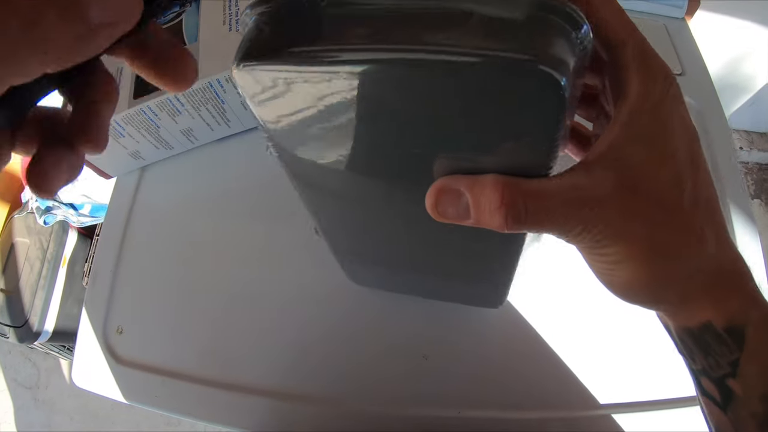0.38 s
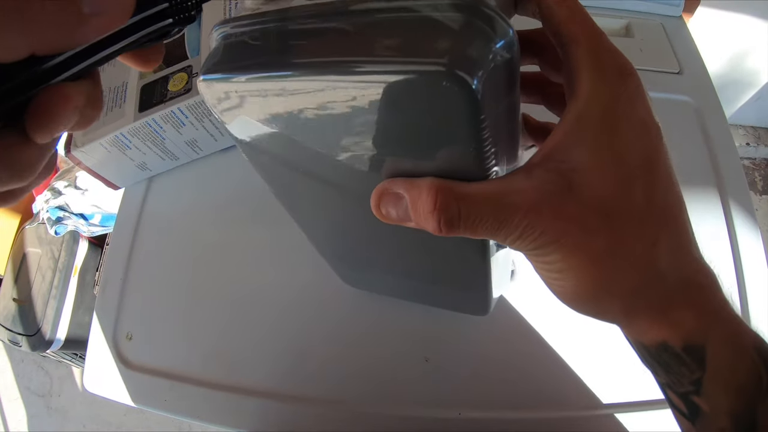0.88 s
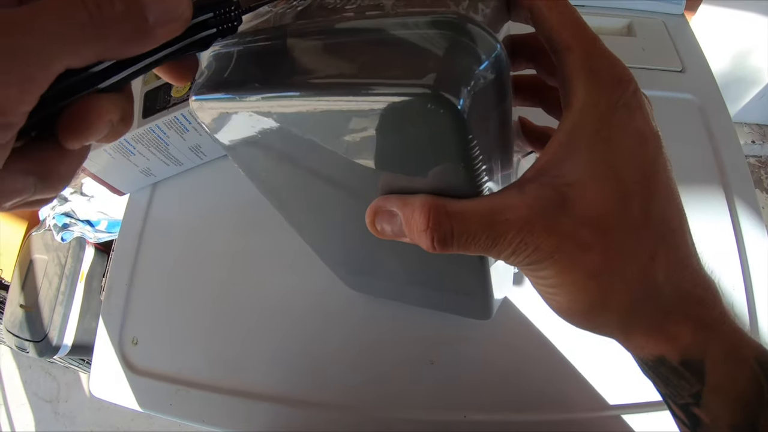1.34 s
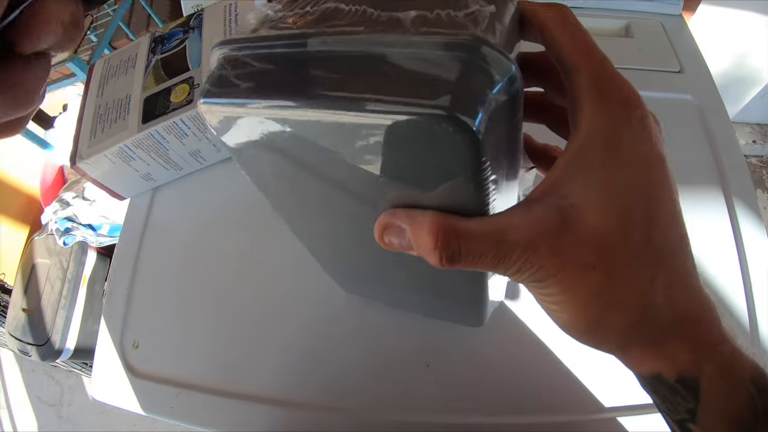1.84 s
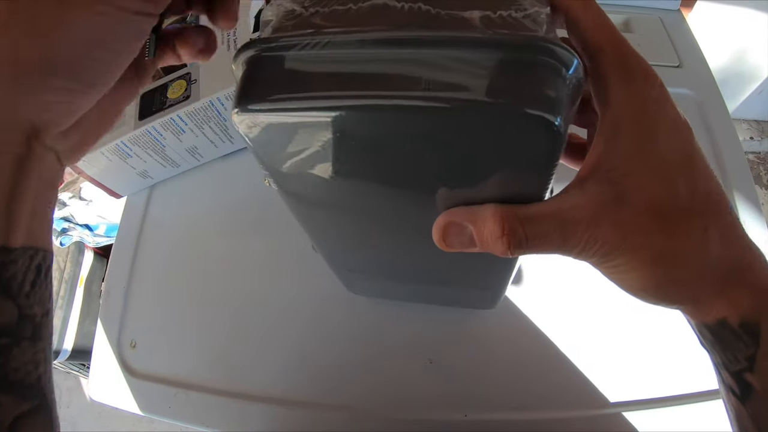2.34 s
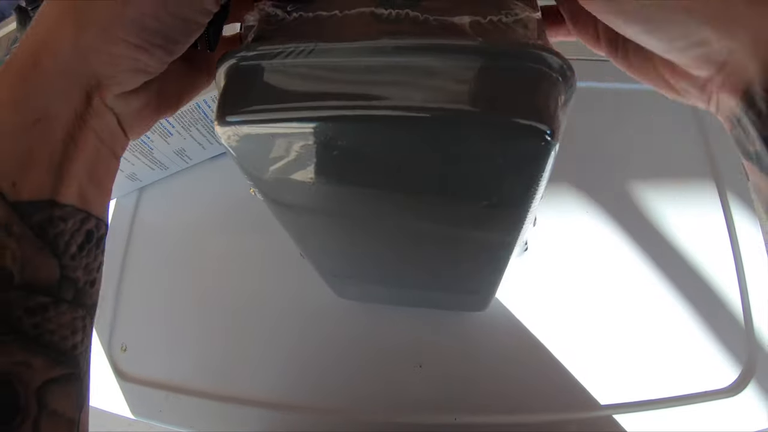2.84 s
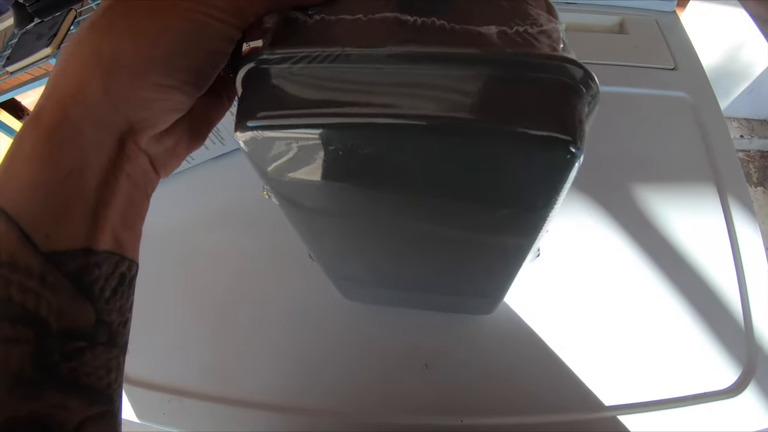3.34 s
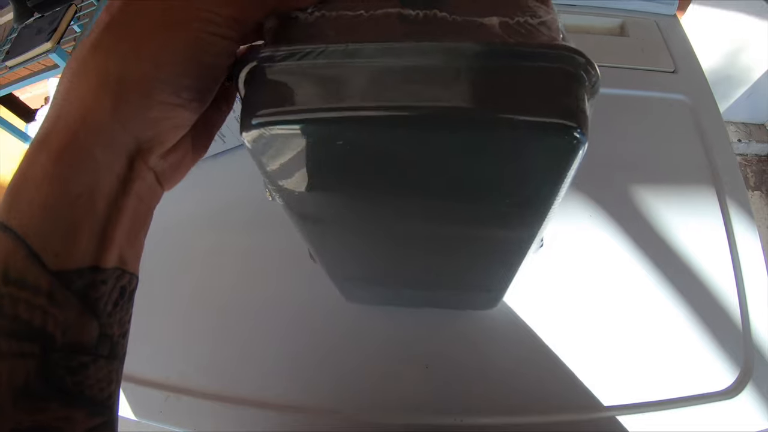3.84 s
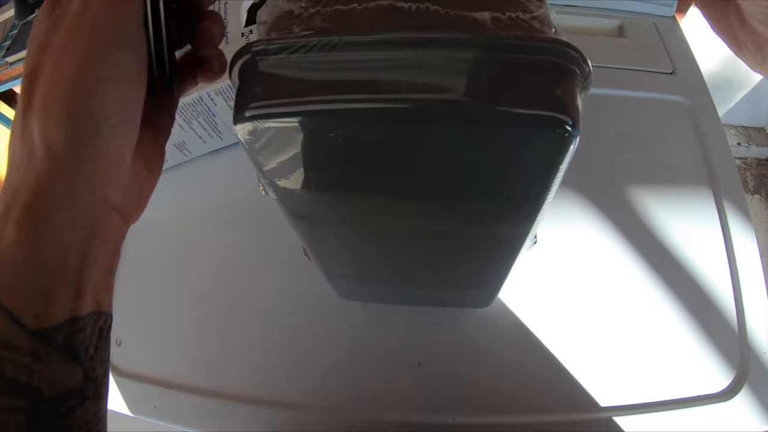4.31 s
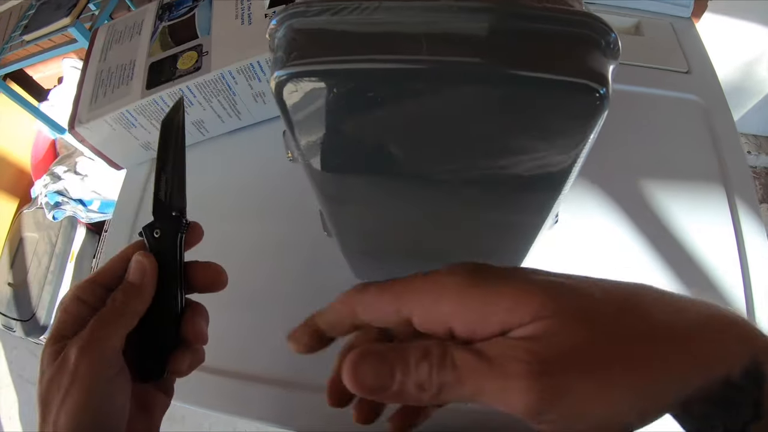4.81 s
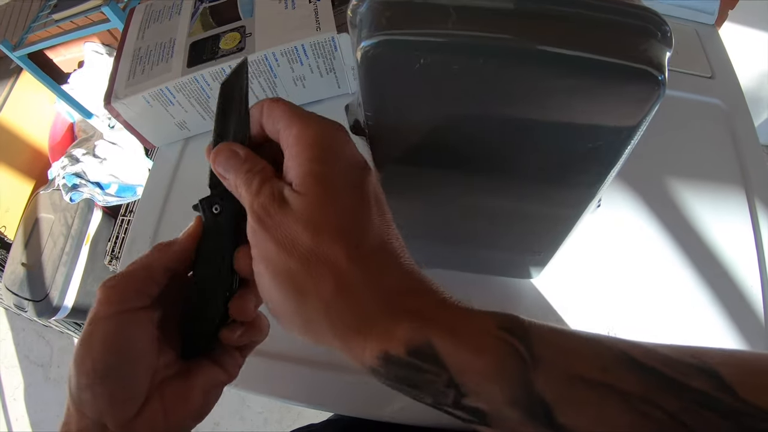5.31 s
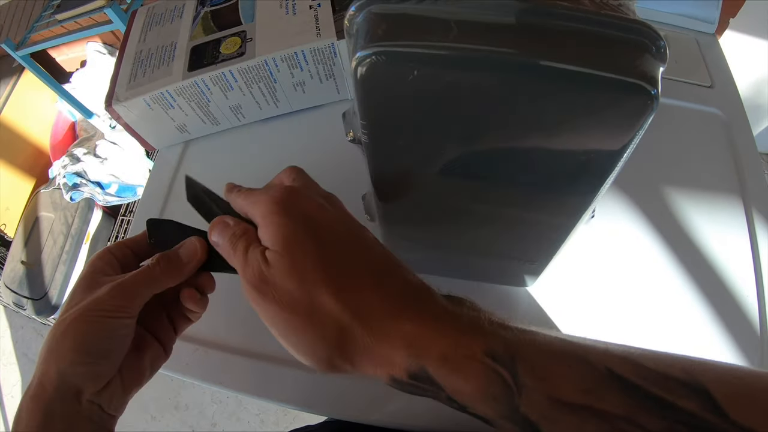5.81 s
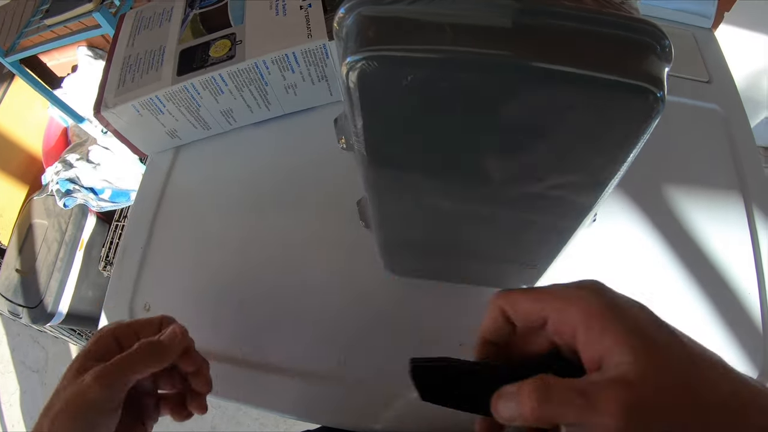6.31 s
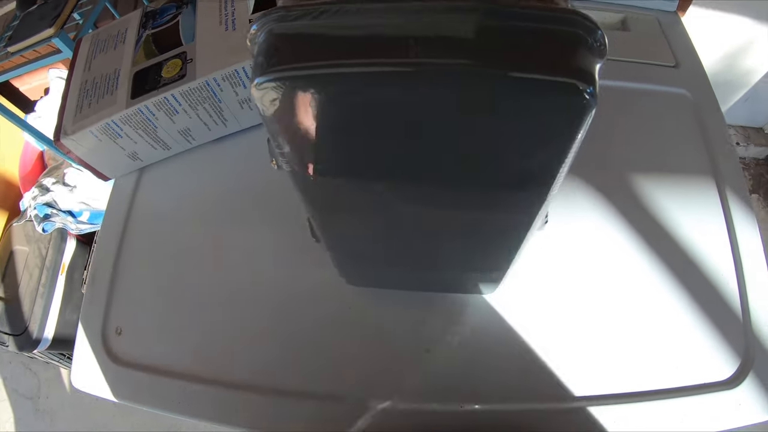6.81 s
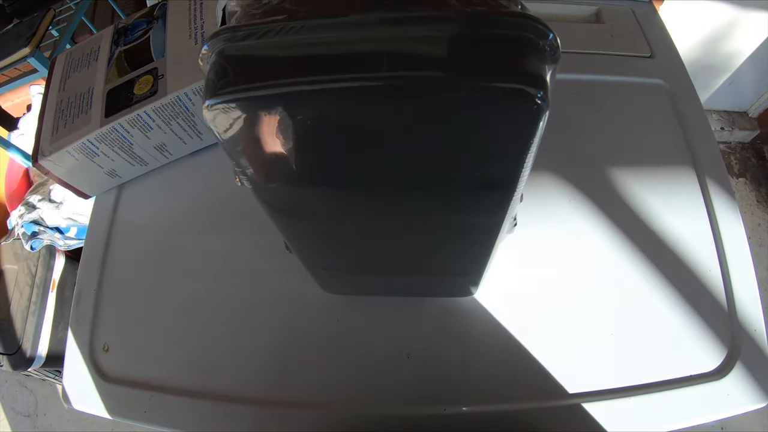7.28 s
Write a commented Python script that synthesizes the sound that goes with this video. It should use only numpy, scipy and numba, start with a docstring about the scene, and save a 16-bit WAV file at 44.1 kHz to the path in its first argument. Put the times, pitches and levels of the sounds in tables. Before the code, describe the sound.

Steady low traffic rumble and soft tyre roar lie behind everything, slightly to the right, swelling gently. At 0 s a box bumps lightly on a hollow table, with a faint shudder and film rubbing. From 1.1 to 1.4 s film crackles brightly; around 1.65 s comes the sharpest snap, with knocks, then the heaviest dull, boomy thumps near 1.9 s. Smaller bumps and rustles follow, with a wavering far engine hum at 2.4-3.1 s. At 2.9 s a finger drags briefly on taut film. Crinkling resumes at 3.2 s and thickens into a dense tearing crackle from 3.6 to 4.2 s, with light table bumps. Another engine hums low from 4.2 to 5.1 s amid faint rubbing. Small knife clicks sound at 5.4-5.55 s, a tight, crisp cluster at 5.9 s, and one at 6.54 s. A car passes softly around 5.7 s; faint rustle and traffic remain until about 7.7 s.

```python
"""First a box bumps a hollow table outdoors, over the hum of far traffic, as film and sleeves begin to rub.
Then hands tear plastic film off the box: creases snap and rustle, and a finger drags on the taut film.
Engines hum far off, a car passes nearer, and the lock, blade and clip of a knife click near the end.
Noise is shaped into traffic, rubbing, scraping and dragging; resonances carry the table's shudder.
Short dying sines make the bumps, snaps and clicks, and a noise tail from nearby walls follows near sounds."""
import sys
import numpy as np
from scipy import signal
from scipy.fft import rfft, irfft
from scipy.io import wavfile
from scipy.ndimage import uniform_filter1d
from numba import njit

SR = 44100
rng = np.random.default_rng(int(sys.argv[2]) if len(sys.argv) > 2 else 0)


def gain_from_decibels(decibels):
    """Convert decibel values to linear amplitude factors."""
    exponent = np.asarray(decibels, float) / 20
    return 10 ** exponent


def generate_wav(signal):
    """Clip the signal to [-1, 1] and save it as 16-bit WAV at the path in sys.argv[1]."""
    frames = np.transpose(np.atleast_2d(signal))
    scaled = np.clip(frames, -1, 1) * 32767
    pcm = np.round(scaled).astype(np.int16)
    wavfile.write(sys.argv[1], SR, pcm)


N = 337806  # length in samples
T = np.arange(N) / SR  # time of every sample, in seconds
LEFT_RIGHT = np.array([[1], [-1]])


def along(table):
    """Read each column of a table that starts with time, at every sample."""
    s, *columns = np.transpose(table)
    return [np.interp(T, s, column) for column in columns]


def on_log(hz, table):
    """Read a (frequency, value) table, with frequency on a log scale as in hearing."""
    table_hz, value = np.transpose(table)
    return np.interp(np.log(np.maximum(hz, 1)), np.log(table_hz), value)


def colour(x, table):
    """Filter a sound to the given spectrum, with no sound ahead of its cause (minimum phase)."""
    cepstrum = irfft(np.log(gain_from_decibels(on_log(np.fft.rfftfreq(1024, 1 / SR), table))))
    # folding the second half onto the first makes the filter causal
    cepstrum[1:512] *= 2
    cepstrum[513:] = 0
    impulse = irfft(np.exp(rfft(cepstrum)))
    return signal.fftconvolve(x, impulse[None], axes=1)[:, :N]


# how much sound from all around differs between the two microphones:
# (frequency [Hz], side minus mid [dB])
STEREO_WIDTH = [(60, -23.5), (110, -23.5), (200, -17), (380, -16.5), (700, -2), (1290, 1.5), (2380, -4.5),
                (4400, -6.5), (8120, 3.5), (15000, -5)]


def diffuse(spectrum, size=N):
    """Stereo noise of rms 1 from all around: nearly alike in the bass, wider higher up."""
    hz = np.fft.rfftfreq(size, 1 / SR)
    mid, side = rfft(rng.standard_normal((2, size))) * gain_from_decibels(on_log(hz, spectrum))
    x = irfft(mid + LEFT_RIGHT * side * gain_from_decibels(on_log(hz, STEREO_WIDTH)), size)
    return x / np.sqrt(np.mean(x ** 2))


def walk(rate_hz):
    """A random wandering curve: values held for 1 / rate_hz seconds, then smoothed twice."""
    k = int(SR / rate_hz)
    held = np.repeat(rng.standard_normal(N // k + 1), k)
    return 1.05 * uniform_filter1d(uniform_filter1d(held, k), k)[:N]


@njit
def grains(start, hz, cycles, size, rise):
    """Each grain is a sine that swells over about `rise` cycles and dies by 1 / e in `cycles` cycles."""
    out = np.zeros(N)
    for k in range(len(start)):
        turn = np.exp((2j * np.pi - 1 / cycles[k]) * hz[k] / SR)
        swell = np.exp(-hz[k] / SR / rise)
        i = int(start[k])
        # the start may fall between two samples
        z, unborn = size[k] * turn ** (i + 1 - start[k]), swell ** (i + 1 - start[k])
        while abs(z) > abs(size[k]) * 1e-3 and i + 1 < N:
            i += 1
            out[i] += z.imag * (1 - unborn) ** 2
            z, unborn = z * turn, unborn * swell
    return out


def panned_grains(s, hz, cycles, size, pan_db, lag):
    """The same grains at both microphones, with a level step [dB] and a lag [samples] between them."""
    hz = np.clip(hz, 200, .4 * SR)
    sides = []
    for side in (1, -1):
        start = np.maximum(s * SR + side * lag / 2, 0)
        sides.append(grains(start, hz, cycles, size * gain_from_decibels(side * pan_db / 2), 0.21))
    return np.array(sides)


# swelling of the traffic, before a small fixed lift of each part:
# (time [s], tyre roar level [dB], rumble level [dB])
TRAFFIC_SWELLS = [(0, -50, -37), (.4, -52.5, -40), (1.0, -51.5, -37.5), (2.2, -51, -39.5),
                  (3.0, -52.5, -42), (3.5, -50.5, -35.5), (4.15, -51, -44), (4.6, -51, -38.5),
                  (5.1, -50.5, -34.5), (5.5, -49.5, -40.5), (5.9, -51, -34.5), (6.6, -51.5, -38.5),
                  (7.66, -50.5, -39.5)]
# spectrum shape of the far tyre roar: (frequency [Hz], relative level per Hz [dB])
ROAR_COLOUR = [(60, -32), (100, -5.5), (250, -8.5), (340, -13), (390, -10.5), (450, -16), (760, -18.5),
               (1000, -22.5), (1420, -24.5), (2070, -29), (3000, -39), (4800, -50.5), (10000, -59.5),
               (11000, -67), (14300, -99)]
# spectrum shape of the low rumble: (frequency [Hz], relative level per Hz [dB])
RUMBLE_COLOUR = [(8.8, -49.5), (15, -0.5), (43, 6.5), (130, -14), (170, -44.5), (290, -120)]
# spectrum shape of the nearer car's tyres: (frequency [Hz], relative level per Hz [dB])
CAR_TYRE_COLOUR = [(450, -27), (750, 9), (1100, -9.5), (1450, 2.5), (1900, -2.5), (2500, -49.5)]


def traffic():
    """Tyre roar and low rumble swell on their own; one car gets louder as it nears, then fades."""
    roar_db, rumble_db = along(TRAFFIC_SWELLS)
    roar = gain_from_decibels(roar_db + 3.5 + walk(4.5)) * diffuse(ROAR_COLOUR)
    rumble = gain_from_decibels(rumble_db + 1.0 + 1.7 * walk(5)) * diffuse(RUMBLE_COLOUR)
    nearest_s, speed_m_s, nearest_m, nearest_db = 5.7, 15, 6.4, -55
    distance_m = np.hypot(nearest_m, speed_m_s * (T - nearest_s))
    car = gain_from_decibels(nearest_db) * nearest_m / distance_m * diffuse(CAR_TYRE_COLOUR)
    return roar + rumble + car


REST_DB = -88.5  # rubbing level between strokes, on the scale of the strokes below
# strokes of film and sleeves rubbing, levels before the hiss and crackle are scaled:
# (start [s], length [s], level at the start [dB], level at the end [dB])
RUB_STROKES = [(0, 0.076, -66, -75), (0.314, 0.06, -65, -69), (0.391, 0.17, -75, -63),
               (0.537, 0.12, -57.5, -69), (0.721, 0.02, -57.5, -53.5), (1.093, 0.043, -47.5, -71),
               (1.173, 0.08, -55, -49), (1.316, 0.23, -67, -56), (1.565, 0.081, -62.5, -49),
               (1.671, 0.14, -46, -57), (1.837, 0.078, -68, -71), (1.966, 0.14, -68.5, -58),
               (2.211, 0.22, -60, -79), (2.431, 0.036, -63.5, -74), (2.6, 0.069, -55, -71),
               (2.666, .065, -69, -66), (2.928, 0.41, -69.5, -65), (3.279, 0.2, -50, -65),
               (3.462, 0.2, -55.5, -60), (3.695, 0.05, -53.5, -51), (3.784, 0.22, -47, -47.5),
               (4.079, 0.017, -44, -65), (4.116, 0.094, -65, -51.5), (4.405, 0.2, -71, -66),
               (4.634, 0.072, -72, -62), (4.72, 0.087, -61, -72), (4.878, 0.077, -69, -70),
               (4.997, 0.45, -75, -77.5), (5.354, 0.018, -59, -65), (5.55, 0.39, -62.5, -71),
               (5.908, 0.025, -38.5, -52), (5.94, 0.084, -53.5, -68), (6.039, 0.057, -74, -67),
               (6.129, 0.096, -68.5, -69.5), (6.298, .4, -70, -72), (6.948, 0.14, -74, -79.5),
               (7.198, 0.18, -81.5, -78)]


def rubbing():
    """Level of the rubbing in dB: each stroke sets in fast, drifts from first to last level and dies fast."""
    rise_db_s, fall_db_s = 899.5, 748
    db = np.full(N, 1. * REST_DB)
    for s, length, first_db, last_db in RUB_STROKES:
        held = np.interp(T, [s, s + length], [first_db, last_db])
        before = rise_db_s * np.maximum(s - T, 0)
        after = fall_db_s * np.maximum(T - s - length, 0)
        db = np.maximum(db, held - before - after)
    return db


# spectrum shape of the rubbing hiss: (frequency [Hz], relative level [dB])
HISS_COLOUR = [(2000, -12), (3000, 3), (5000, -6.5), (7000, -9.5), (10300, -8), (11300, -23), (14000, -24),
               (16000, -41.5)]
# how the film colours its creases, both tiny ones here and the snaps: (frequency [Hz], gain [dB])
CREASE_COLOUR = [(300, -7), (900, -1), (1800, 2.5), (3000, 3), (4600, 2), (6000, 5.5), (8000, 5),
                 (10000, 9), (11500, -1), (14000, 4.5), (16400, -16)]


def rustle(count=18000):
    """Rubbing hiss in patchy bands around a moving centre; firm rubbing brings out thousands of tiny creases."""
    db = rubbing()
    centre_hz = 4100 + 42.5 * (db - REST_DB)  # firmer rubbing is brighter
    chance = rng.random((count, 5)).T
    pitch = 1600 * 2 ** (2.49 * chance[3])
    # most are faint, none far above the rest; low ones last longer, so they start weaker
    size = gain_from_decibels(-3.0 * np.log(chance[1] + .02)) * np.sign(chance[2] - .5) * np.sqrt(pitch)
    pan_db, lag = 6 * (chance[4] - .4), 4 * (chance[4] - .5)
    tiny = panned_grains(chance[0] * N / SR, pitch, np.full(count, 1.2), size, pan_db, lag)
    tiny = colour(tiny, CREASE_COLOUR)
    grit = np.clip((db + 62.0) / 12, 0, 1)  # 0 = hiss only, 1 = full crackle
    hiss, source = 0, diffuse(HISS_COLOUR)
    for hz in 2200 * 2 ** np.arange(0, 2.8, .2):
        edges_hz = [hz / 2 ** .1, hz * 2 ** .1]
        band = signal.sosfilt(signal.butter(2, edges_hz, "band", fs=SR, output="sos"), source)
        octaves = np.log2(hz / centre_hz)
        hiss = hiss + band * gain_from_decibels(np.maximum(-12 * octaves ** 2, -8) + 2.0 * walk(33))
    crackle = gain_from_decibels(0.5) * grit * tiny / tiny.std()
    hiss = gain_from_decibels(10.0 + 2.3 * walk(40)) * (1 - 0.72 * grit) * hiss
    return gain_from_decibels(db) * (crackle + hiss)


# the box shuddering on the table, level of the push before filtering:
# (start [s], length [s], level [dB])
BOX_SHUDDERS = [(0, .07, -40), (.16, 0.058, -48), (1.249, .025, -40.5), (1.708, 0.093, -38),
                (2.026, .07, -44), (3.195, .03, -44), (3.766, 0.071, -43), (3.894, 0.082, -44.5)]
# tones in which the hollow table top rings, for shudders and bumps alike:
# (frequency [Hz], relative level [dB], free ring time for a 60 dB drop [s])
TABLE_TOP_MODES = [(40.4, 11, 0.24), (58, -4.5, 0.07), (69.6, 5, 0.66), (95, -5, 0.16), (152.1, 0, 0.76),
                   (180.1, -5, 1), (239, 0.5, 0.15), (265.7, 0, 0.8), (317, -10.5, 0.97), (393, -2, 0.21),
                   (482.5, -10, 0.36), (581, -10, 0.12), (731, -10.5, 0.13), (890, -4.5, 0.07),
                   (1225, -5.5, 0.07)]


def shudder():
    """While the box rocks or the film tugs at it, its foot chatters and keeps the table's middle modes going."""
    chatter_hz, chatter_top_hz, chatter_db_per_oct2 = 267, 474, 15.5
    ring_share = .4  # of the free ring time
    push = sum(gain_from_decibels(db) * ((T >= s) & (T < s + length)) for s, length, db in BOX_SHUDDERS)
    push = uniform_filter1d(push, size=300) * gain_from_decibels(2.5 * walk(60)) * rng.standard_normal(N)
    # the contact is soft: hardly any treble gets through
    push = signal.sosfilt(signal.butter(4, chatter_top_hz, fs=SR, output="sos"), push)
    out = 0
    for hz, db, t60 in TABLE_TOP_MODES:
        width_hz = np.log(1000) / (np.pi * t60 * ring_share)
        reach_db = -chatter_db_per_oct2 * np.log2(hz / chatter_hz) ** 2
        ringing = signal.lfilter(*signal.iirpeak(hz, hz / width_hz, SR), push)
        # narrow modes catch less of the noise, so they are made up for it
        out = out + gain_from_decibels(db + reach_db) * ringing * np.sqrt(SR / width_hz / np.pi)
    return out


# the box bumping the table: (time [s], blow strength [dB], contact time [ms],
# scrape relative to the blow [dB], share of the free ring time that the hand allows [ratio])
BOX_BUMPS = [(0.002, -24.5, 1.04, -19, 1), (1.25, -30, 0.5, -9, 0.41), (1.266, -33, 1.3, -19, 0.4),
             (1.521, -31, 0.8, -10, 0.47), (1.657, -17, 0.32, -19.5, 0.64), (1.677, -13, 19, -46, 0.57),
             (1.712, -22.5, 5.3, -27, 1), (1.885, -15.5, 1.5, -29.5, 0.29), (1.899, -9.5, 7.1, -47, 0.25),
             (1.948, -13, 11.4, -32, 0.39), (1.94, -21.5, 0.5, -13.5, 0.48), (1.972, -29, 1.6, -20, 1),
             (2.04, -23, 1.5, -20, 0.45), (2.436, -29, 2.5, -20, 0.7), (3.192, -26, 1.4, -23, 0.2),
             (3.206, -33, 0.73, -20, 0.49), (3.241, -26.5, 4.1, -27, 0.42), (3.775, -33, 0.61, -20, 0.53),
             (3.797, -37, 2.1, -6.5, 0.63), (3.83, -32, 2, -15, 0.74), (3.91, -39, 2.1, -11.5, .4)]


def table_bumps():
    """Each bump pushes for its contact time and wakes the modes of the top in its own proportions."""
    s, db, contact_ms, _, ring_share = np.transpose(BOX_BUMPS)
    hz, mode_db, t60 = np.transpose(TABLE_TOP_MODES)
    chance = rng.standard_normal((len(s), len(hz), 4))
    # a longer contact starves the upper modes
    soft = 1 / (1 + (np.outer(np.abs(contact_ms), hz) / 1000) ** 2)
    level_db = db[:, None] + mode_db - 11.0 + 2.7 * chance[..., 0]
    size = gain_from_decibels(level_db) * soft * np.exp(3j * chance[..., 1])  # random phase
    # the weight of box and hand shifts the modes a little from bump to bump
    tone = hz * (1 + 0.01 * chance[..., 2])
    # the box rocks before it settles, so modes start a few ms apart
    start = (s[:, None] + 0.00431 * np.abs(chance[..., 3])) * SR
    cycles = np.outer(np.clip(ring_share, .1, 2), t60 * hz / np.log(1000))
    return grains(start.ravel(), tone.ravel(), cycles.ravel(), size.ravel(), 0.3)


def scuffs():
    """The rim of the box scrapes briefly as it lands: rough noise that dies away after each bump."""
    s, db, _, scuff_db, _ = np.transpose(BOX_BUMPS)
    hits = np.zeros(N)
    hits[(s * SR).astype(int)] = gain_from_decibels(db + scuff_db)
    fade_s = 0.029  # time to fall to 1 / e
    fade = signal.lfilter([1], [1, -np.exp(-1 / (fade_s * SR))], hits)
    rough = uniform_filter1d(fade, size=60) * gain_from_decibels(4.0 * walk(180))
    scrape = diffuse([(250, -21.0), (500, 11.0), (1200, -2.5), (4000, -15.0), (5500, -54.5)])
    return rough * scrape.mean(0)


# how long the yard rings: (frequency [Hz], time for a 60 dB drop [s])
YARD_RING_TIMES = [(500, 0.99), (2000, 0.11), (4000, 0.093), (8000, 0.15), (14000, 0.14)]


def yard(x, size=22050):
    """Walls nearby return a diffuse tail whose bass lasts longest."""
    t, tail = np.arange(size) / SR, 0
    for hz in 500 * 2 ** np.arange(0, 5, .5):
        band = diffuse([(hz / 1.5, -40), (hz / 1.2, 0), (hz * 1.2, 0), (hz * 1.5, -40)], size)
        band = band * np.sqrt(hz / 4000)  # higher bands are wider, so they hold more noise
        # hard walls return the treble best
        band = band * gain_from_decibels(1.0 * np.log2(hz / 4000))
        decay = 10 ** (-3 * t / on_log(hz, YARD_RING_TIMES))
        tail = tail + band * decay * np.minimum(t / 0.0011, 1)
    return gain_from_decibels(-50) * signal.fftconvolve(x.mean(0)[None], tail, axes=1)[:, :N]


# creases of the film snapping, before each part is scaled and coloured:
# (time [s], level [dB], central pitch [Hz], after-slips relative to the snap [dB],
# bright edge relative to the snap [dB])
FILM_SNAPS = [(1.0806, -23.5, 3530, -12, -8), (1.0885, -37, 5500, -11, 1), (1.1139, -22.5, 3350, -14, -6),
              (1.176, -43.5, 1590, -3, 1.5), (1.1872, -45, 1240, -3, -8), (1.1915, -35, 3430, -9, -1.5),
              (1.1884, -27.5, 3260, -14, -3), (1.2074, -22, 3660, -7, 6), (1.2213, -30.5, 3100, -6, 2.5),
              (1.2319, -17.5, 2860, -6, 9.5), (1.2486, -14.5, 4040, -14, 8), (1.2528, -18, 3230, -4, 5),
              (1.2545, -24.5, 2500, -7, 0.5), (1.2668, -24, 5786, -14, -0.5), (1.2715, -15.5, 5700, -8, 3),
              (1.3495, -23, 3450, -10, 9.5), (1.3931, -39.5, 5200, -5, 9.5),
              (1.415, -20.5, 3360, -10.5, -8), (1.4925, -30, 3020, -9.5, -3.5),
              (1.5089, -36, 2950, -3, 1.5), (1.5244, -30.5, 2600, -3, 1.5), (1.568, -26, 3270, -6, -1.5),
              (1.5968, -32.5, 5800, -11, -2), (1.6397, -37, 5500, -8, 5.5), (1.6505, -25, 2945, -7, -6.5),
              (1.6607, -19.5, 3440, -14, -6), (1.6645, -1.5, 3050, -12.5, -5.5),
              (1.6662, -1.5, 5560, -26, -5.5), (1.6678, -11, 5800, -12, -8), (1.8937, -42.5, 2820, 7.5, 6),
              (1.9451, -38.5, 3280, -13, -10), (1.9762, -44, 2500, -9, 1), (2.0197, -42, 2170, -10, 5),
              (2.5939, -27, 3070, -4.5, -6.5), (2.6046, -33, 3770, -11, 3), (2.6132, -23, 3530, -8, 6.5),
              (2.6832, -47, 3620, -2, 13.5), (2.8783, -46.5, 2000, -3, 14.5), (3.2108, -38, 4880, 4, -3),
              (3.3002, -39, 3500, -20, -2), (3.3266, -22, 4200, -9, 6.5), (3.4051, -25.5, 3900, -5.5, 4.5),
              (3.4184, -42, 4260, 1, 3), (3.4659, -40, 3550, -6, 12), (3.4753, -27.5, 2730, -12, 6),
              (3.4973, -37.5, 4530, -21, 15), (3.5473, -29, 5700, -2, 2), (3.5729, -25, 4100, -5.5, 6.5),
              (3.6155, -14, 4200, -3.5, -12), (3.6422, -27, 4240, -5, 11.5), (3.6777, -26.5, 4800, -26, 8),
              (3.6833, -24.5, 3330, -4, 14), (3.7197, -14.5, 3100, -3, 16), (3.7368, -12, 5700, -5.5, 0),
              (3.7738, -16, 3440, -5, 12), (3.78, -18, 6140, -5, 4), (3.783, -17.5, 6360, -3, -0.5),
              (3.7875, -21.5, 2600, 1, 6), (3.7945, -27, 6410, -9.5, -4), (3.8016, -28, 1650, -15, -1),
              (3.8025, -15, 3310, -1.5, 2.5), (3.8072, -20, 4060, -18, -7), (3.8157, -30, 2250, 1, -2),
              (3.8236, -28, 3100, -11, 11), (3.8335, -31.5, 2300, 0, 3), (3.844, -30.5, 5500, -12, 2),
              (3.8612, -32, 2690, 3, 1), (3.8739, -31, 3300, -5, 3), (3.8878, -23, 2480, -8, 3),
              (3.9109, -25, 3400, -5, 0), (3.9177, -32, 5000, 3, -1), (3.9236, -20, 3000, -9, 12),
              (3.9335, -23.5, 5200, -8, -7), (3.9445, -29, 3470, 2, 3), (3.9486, -17, 5010, -7, 6),
              (3.952, -25.5, 6060, -13, -3), (3.9631, -14.5, 7990, -15, 4), (3.9698, -21, 2500, -14, 4),
              (3.9779, -17, 3420, -12, 14), (3.9882, -25.5, 2360, -5, 12), (3.9953, -13.5, 3250, -23, 3),
              (4.0007, -30.5, 2240, 0.5, 3), (4.0275, -40, 2204, -9, 1), (4.0796, -18, 3680, -9.5, 10.5),
              (4.1475, -41, 4300, 8, 4), (4.1656, -29, 3380, -9, 9), (4.2071, -24.5, 3000, -5, 0)]


def snaps(count=16):
    """A crease lets go in a short ring with a bright edge; a cloud of after-slips and close echoes follows."""
    s, db, hz, slips_db, edge_db = (np.repeat(c, count) for c in np.transpose(FILM_SNAPS))
    # slack creases, below 2600 Hz, ring longer
    ring = np.clip(0.52 * np.maximum(2600 / hz, 1) ** 3.5, .4, 7)
    # parts 0, 1 and 2 are body, edge and low push of the snap itself; the rest come later
    part = np.tile(np.arange(count), len(FILM_SNAPS))
    later = part > 2
    chance = rng.random((len(s), 5)).T
    delay = np.where(later, 0.000596 + .009 * chance[0] ** 1.8, 0)
    slip_pitch = 2 ** (2.0 * (chance[1] - .4) / np.sqrt(np.maximum(ring, 1)))
    snap_pitch = np.array([1.01, 2.05, .48])[np.minimum(part, 2)] * (0.85 + 0.29 * chance[1])
    pitch = np.where(later, slip_pitch, snap_pitch)
    snap_db = np.where(part == 1, edge_db, np.where(part == 0, 6.0, -1.5))
    part_db = np.where(later, slips_db - 1500 * delay - 6 * chance[2], snap_db)
    # a longer ring takes energy from the edge and the push
    part_db = part_db - np.where((part == 1) | (part == 2), 9 * np.log2(ring / 0.3), 0)
    cycles = ring * np.where(later, 2.2, 1.3)
    sign = np.where(later, np.sign(chance[3] - .5), -1)
    size = sign * gain_from_decibels(db + part_db)
    spread = np.where(later, 5, 2.2) * (chance[4] - .5)
    pan_db, lag = 1.4 + 2.2 * spread, -.8 + 0.57 * spread
    x = panned_grains(s - .0002 + delay, hz * pitch, cycles, size, pan_db, lag)
    return colour(x, CREASE_COLOUR)


# far engines, around which pitch and level waver:
# (start [s], length [s], starting pitch [Hz], glide [Hz per s], level [dB])
FAR_ENGINES = [(2.445, 0.63, 140.1, 7, -48), (3.502, 0.28, 148.6, -3.5, -50),
               (4.231, 0.86, 123.6, -14.5, -47.5)]


def engines():
    """One wavering, gliding tone from each far engine, fading in and out."""
    out = 0
    for s, length, hz, glide_hz_s, db in FAR_ENGINES:
        gate = uniform_filter1d(1. * ((T >= s) & (T < s + length)), size=6000)
        level = np.sqrt(2) * gate * gain_from_decibels(db + 0.94 * walk(3.78) + 2.6 * walk(16))
        pitch_hz = hz + glide_hz_s * (T - s) + 2.35 * walk(9)
        out = out + level * np.sin(2 * np.pi * np.cumsum(pitch_hz) / SR)
    return out


# resonances of the taut film: (frequency [Hz], width of one filter pass [Hz], relative level [dB])
FILM_RESONANCES = [(2000, 190, -2), (3150, 290, -2.5), (3600, 140, -12), (5500, 440, -24), (6600, 310, -20),
                   (9050, 2000, -23)]


def drag():
    """A finger drags on taut film: stick-slip noise in narrow, steep resonances of the film."""
    start_s, length_s, start_db, fade_db_s = 2.905, 0.15, -40, 53
    gate = uniform_filter1d(1. * ((T > start_s) & (T < start_s + length_s)), size=600)
    level_db = start_db - fade_db_s * (T - start_s) + 4.04 * walk(61)
    noise = rng.standard_normal(N) * gate * gain_from_decibels(level_db)
    out = 0
    for hz, width_hz, db in FILM_RESONANCES:
        b, a = signal.iirpeak(hz, hz / width_hz, SR)
        # two passes make the resonance steep
        out = out + gain_from_decibels(db) * signal.lfilter(b, a, signal.lfilter(b, a, noise))
    return out


# lock, blade and clip of the knife clicking, levels before a fixed cut:
# (time [s], level [dB], centre frequency [Hz], reach around it [octaves])
KNIFE_CLICKS = [(5.369, -25, 4350, 0.34), (5.505, -31.5, 4100, 0.42), (5.5487, -36.5, 4400, 0.61),
                (5.8953, -25.5, 3900, 0.94), (5.8972, -33, 3000, 1.1), (5.9007, -22.5, 3420, 0.97),
                (5.9086, -20.5, 4630, 1.0), (5.9097, -22.5, 3220, .9), (5.915, -31, 5200, 1.1),
                (6.0798, -42, 3000, 0.44), (6.304, -45, 3030, .3), (6.538, -31.5, 3170, 1.07),
                (6.5418, -40, 4000, 1)]
# tones of the knife's steel and handle, damped by the hand:
# (frequency [Hz], ring time for a 60 dB drop [s])
KNIFE_TONES = [(1250, 0.04), (1750, 0.016), (2430, 0.025), (2850, 0.016), (3540, 0.019), (4050, 0.019),
               (4600, 0.014), (5660, 0.02), (6550, 0.022), (7600, 0.017), (8600, 0.037), (9500, 0.019),
               (10400, 0.019)]


def knife():
    """Each click wakes the knife's modes around its own centre, with a new mix every time."""
    s, db, centre_hz, reach = np.transpose(KNIFE_CLICKS)
    hz, t60 = np.transpose(KNIFE_TONES)
    chance = rng.standard_normal((len(s), len(hz), 4))
    # distance from the centre, in units of the reach
    away = np.log2(hz / centre_hz[:, None]) / np.maximum(reach, .1)[:, None]
    size = gain_from_decibels(db[:, None] - 10.0 + np.maximum(-6 * away ** 2, -24.0) + 2.2 * chance[..., 0])
    start = s[:, None] + .00015 * np.abs(chance[..., 1])
    tone = hz * (1 + 0.016 * chance[..., 2])
    cycles = np.tile(t60 * hz / np.log(1000), len(s))
    pan_db = 1.5 + 3.3 * chance[..., 3].ravel()
    return panned_grains(start.ravel(), tone.ravel(), cycles, size.ravel(), pan_db, -1.0)


def scene():
    """Near sounds feed the yard; engines and traffic lie behind, on a road a little to the right."""
    near = snaps() + knife() + table_bumps() + scuffs() + shudder()
    road_right_db = .6  # right minus left
    road = (engines() + traffic()) * gain_from_decibels(-road_right_db * LEFT_RIGHT / 2)
    return near + yard(near) + rustle() + drag() + road


def roll_off(x):
    """The treble ends steeply here."""
    return signal.sosfilt(signal.butter(12, 16530, fs=SR, output="sos"), x)


def record(dry):
    """The camera trims the lowest bass with a gentle 15 Hz high-pass filter."""
    mix = signal.sosfilt(signal.butter(1, 15, "high", fs=SR, output="sos"), dry)
    return roll_off(mix)


dry = scene()
out = record(dry)
generate_wav(out)
```